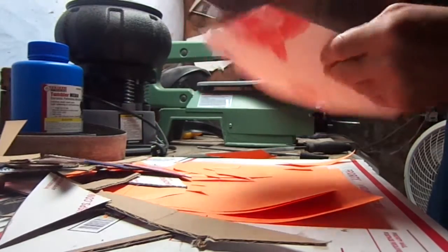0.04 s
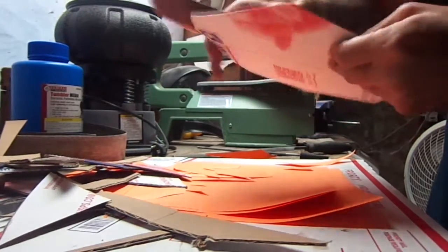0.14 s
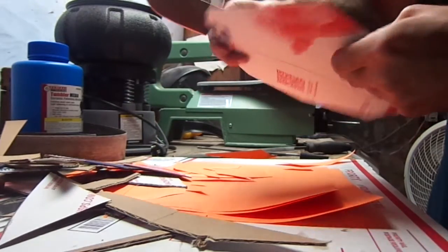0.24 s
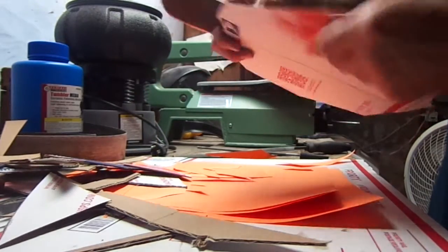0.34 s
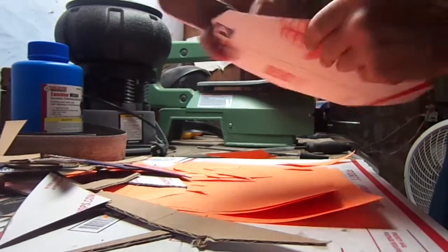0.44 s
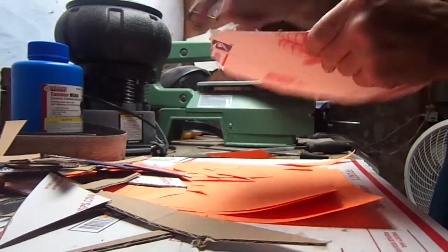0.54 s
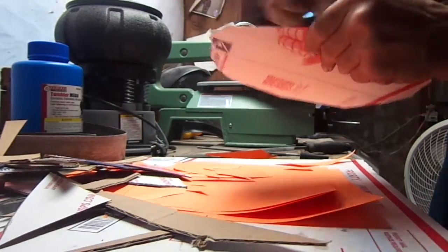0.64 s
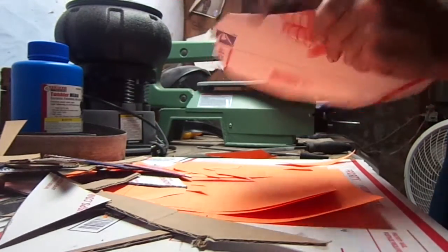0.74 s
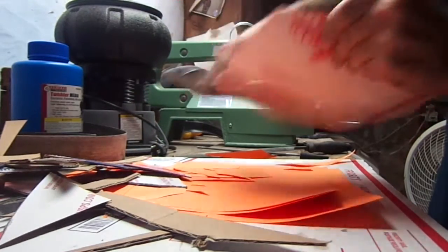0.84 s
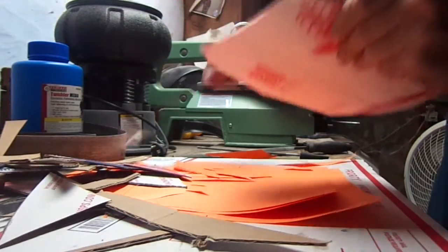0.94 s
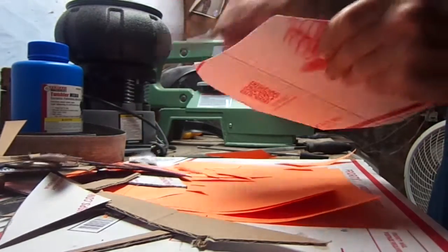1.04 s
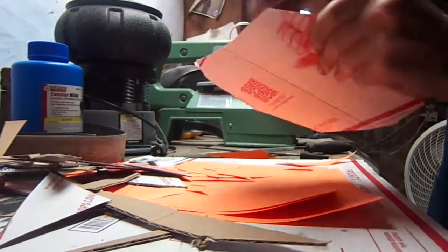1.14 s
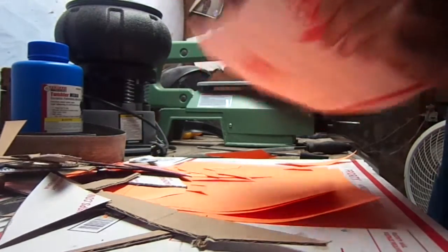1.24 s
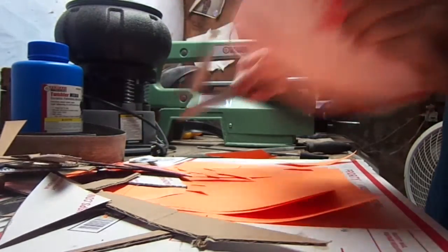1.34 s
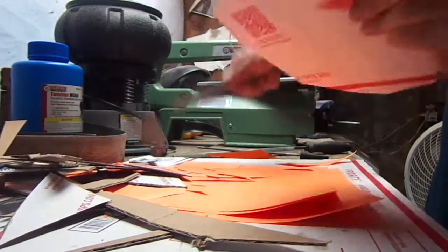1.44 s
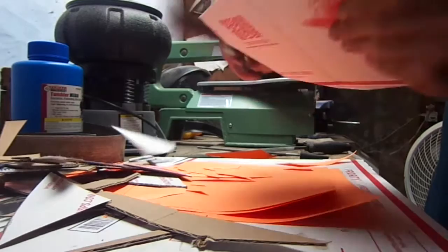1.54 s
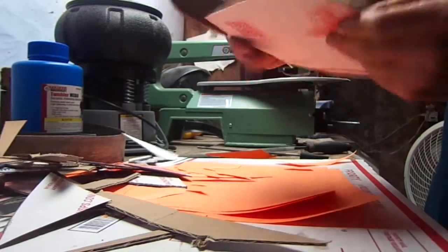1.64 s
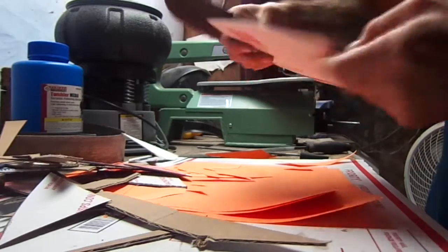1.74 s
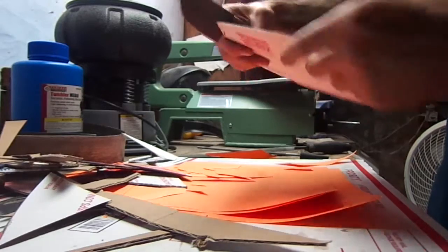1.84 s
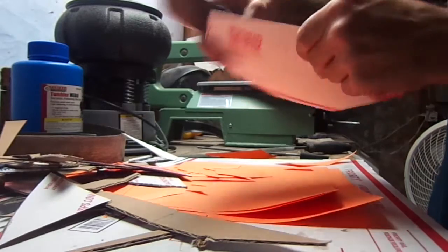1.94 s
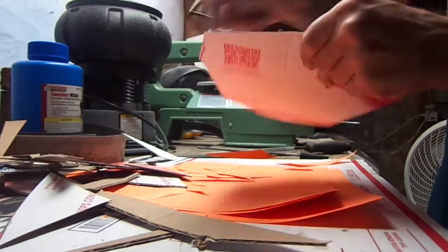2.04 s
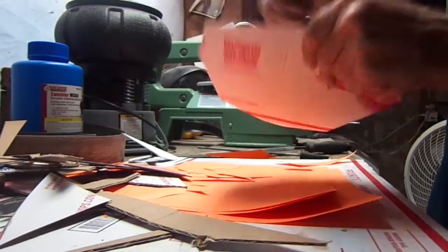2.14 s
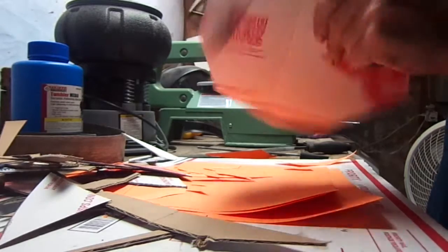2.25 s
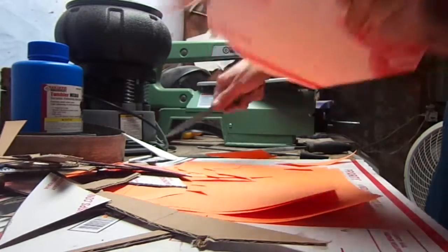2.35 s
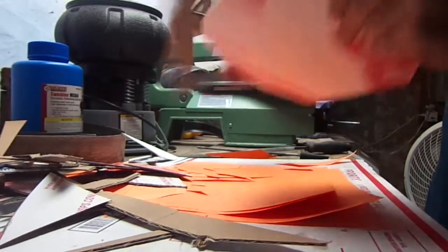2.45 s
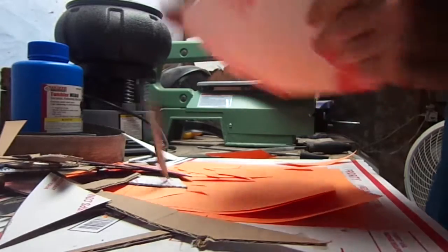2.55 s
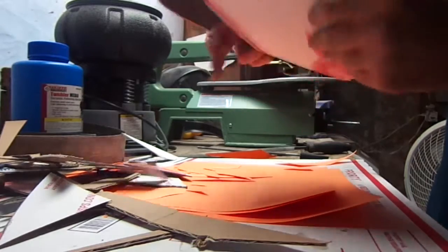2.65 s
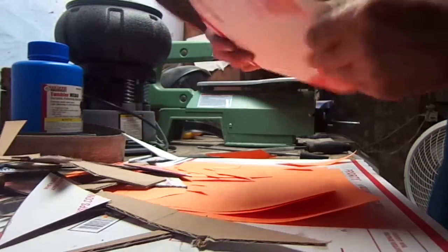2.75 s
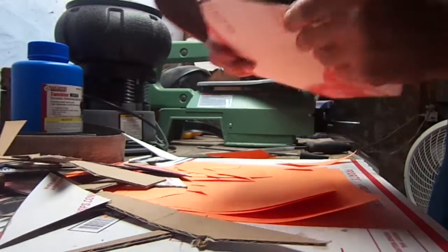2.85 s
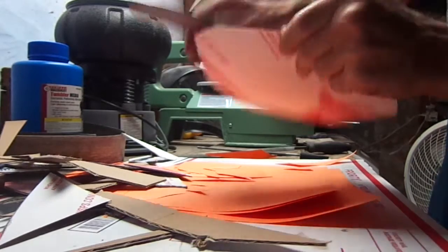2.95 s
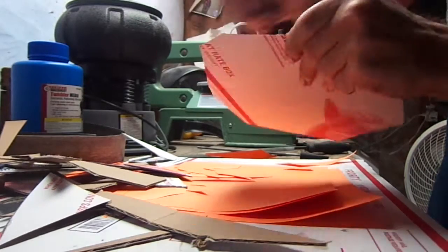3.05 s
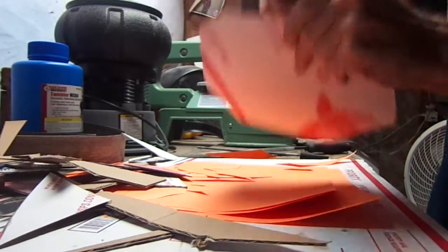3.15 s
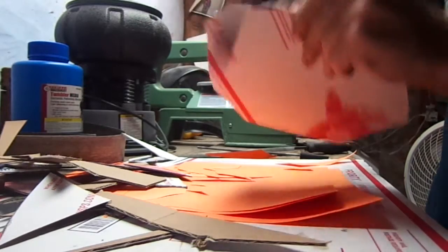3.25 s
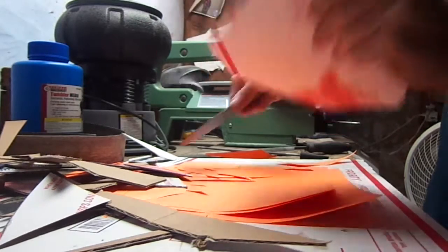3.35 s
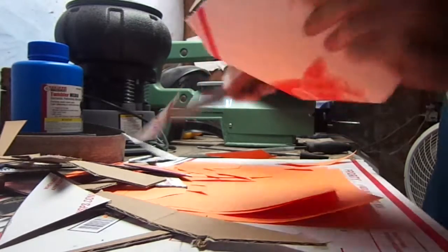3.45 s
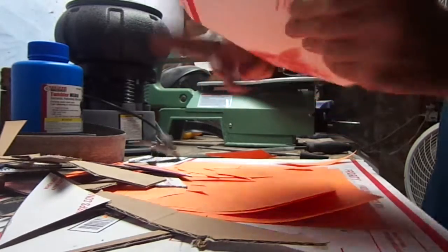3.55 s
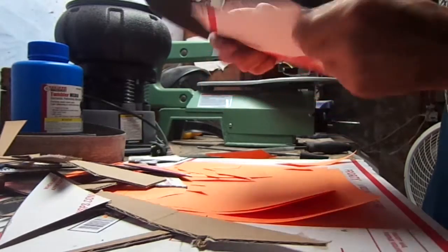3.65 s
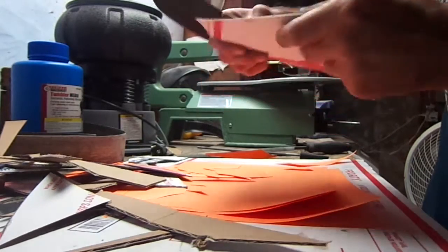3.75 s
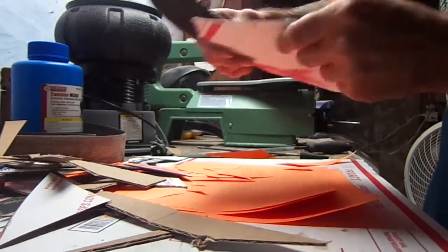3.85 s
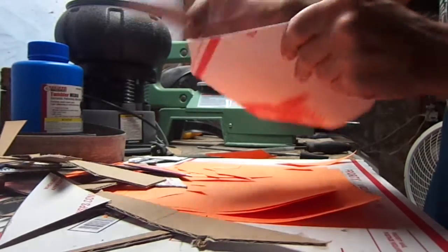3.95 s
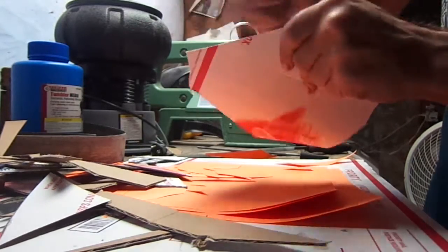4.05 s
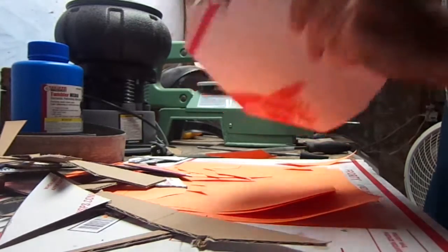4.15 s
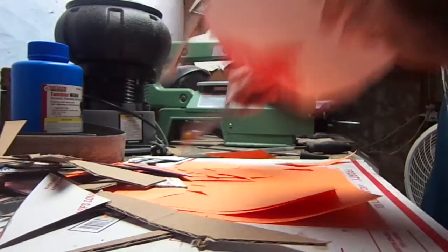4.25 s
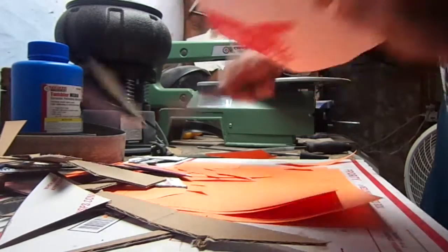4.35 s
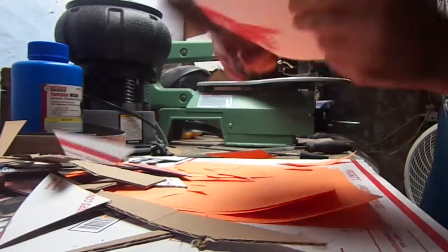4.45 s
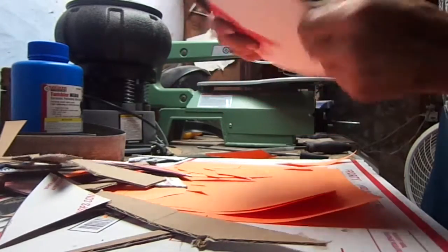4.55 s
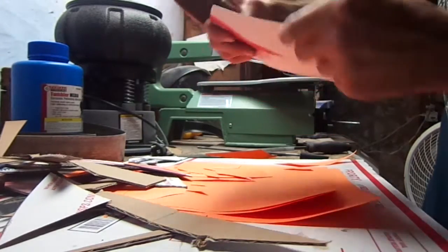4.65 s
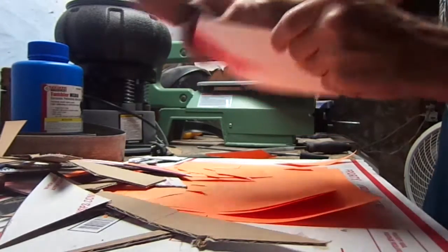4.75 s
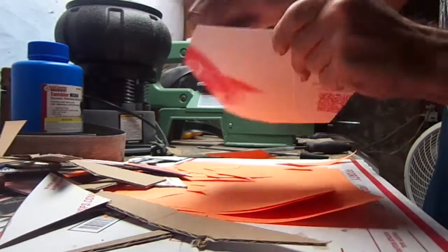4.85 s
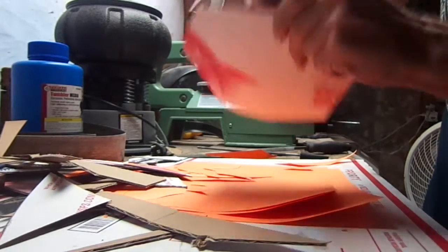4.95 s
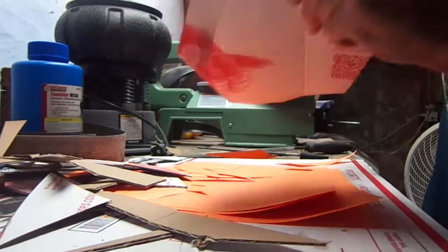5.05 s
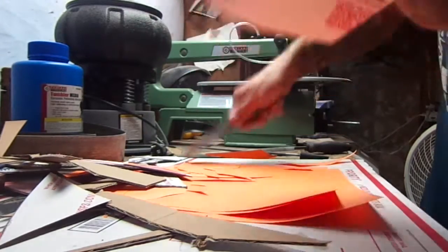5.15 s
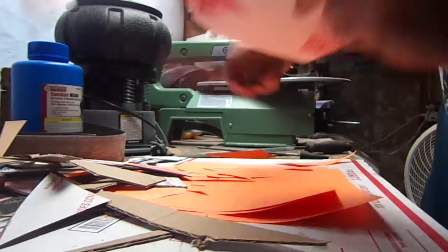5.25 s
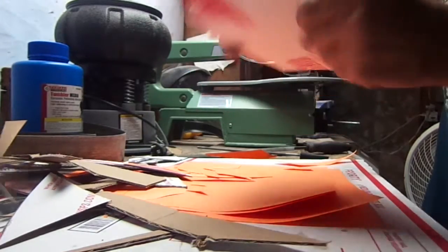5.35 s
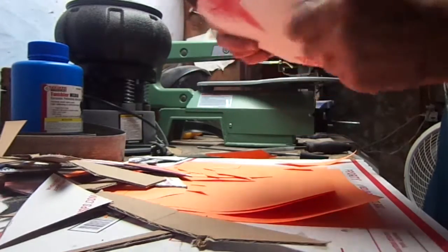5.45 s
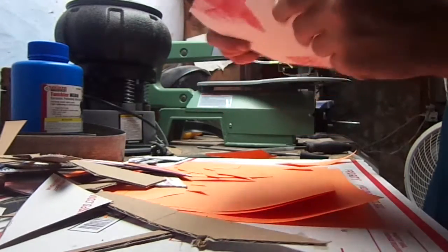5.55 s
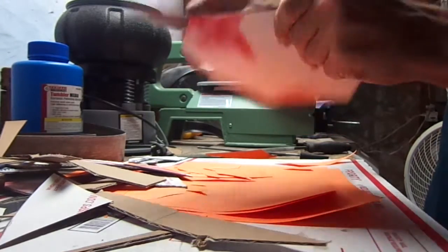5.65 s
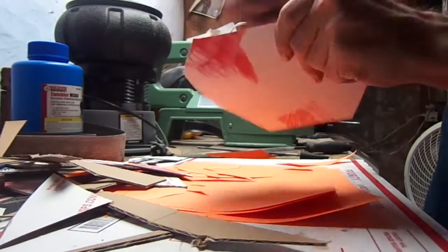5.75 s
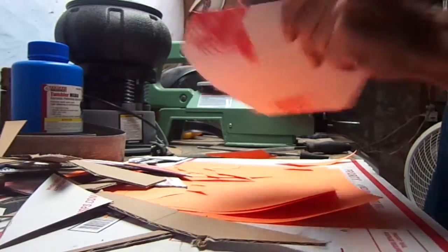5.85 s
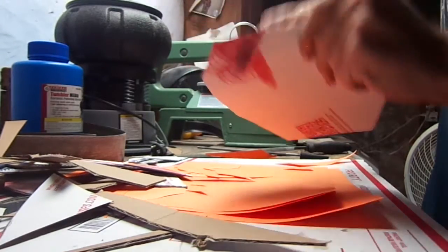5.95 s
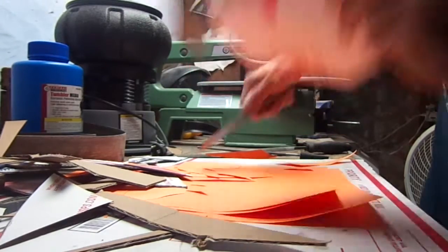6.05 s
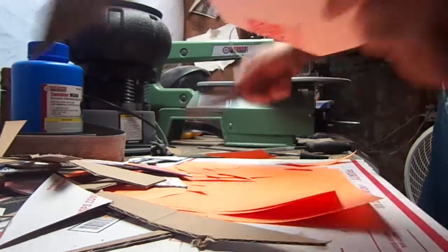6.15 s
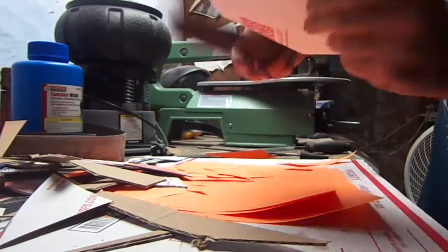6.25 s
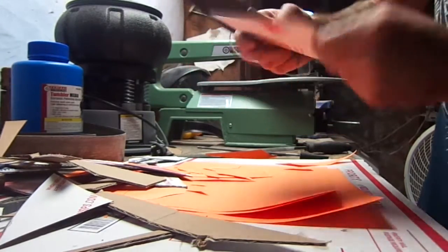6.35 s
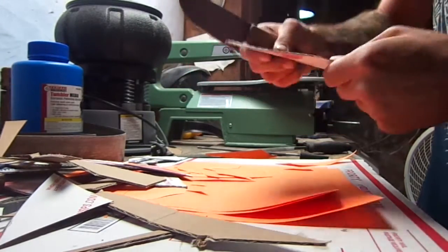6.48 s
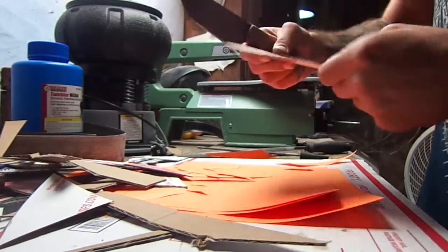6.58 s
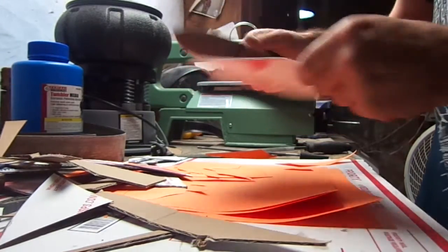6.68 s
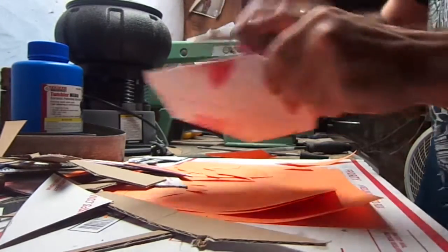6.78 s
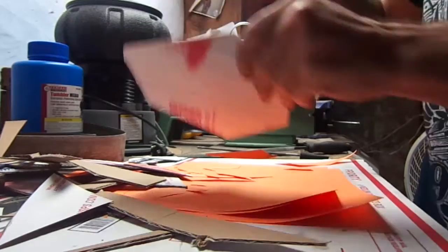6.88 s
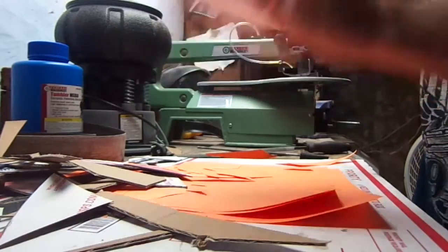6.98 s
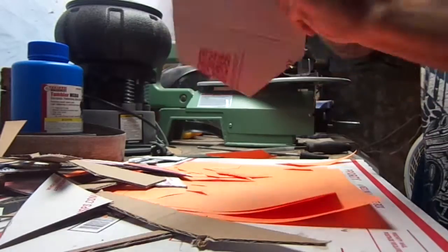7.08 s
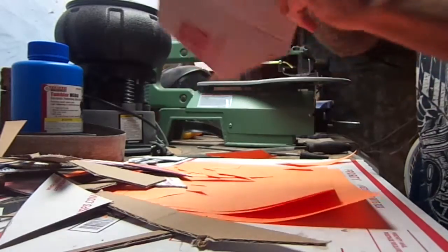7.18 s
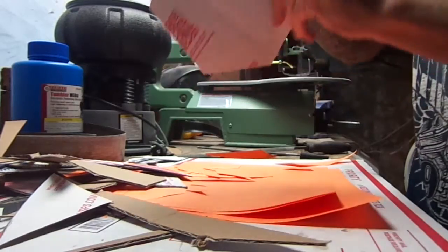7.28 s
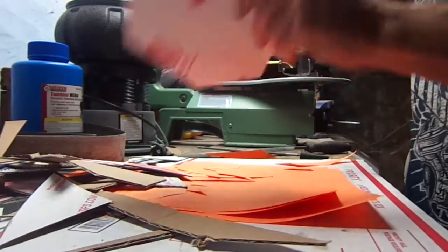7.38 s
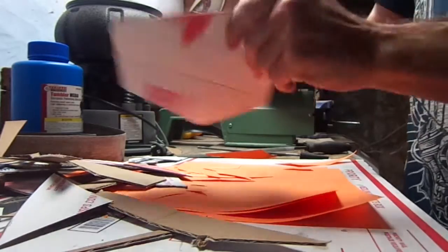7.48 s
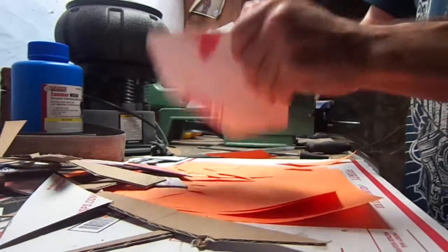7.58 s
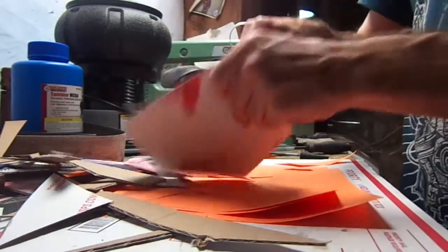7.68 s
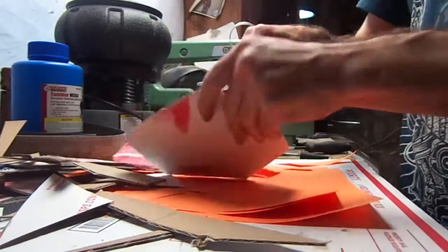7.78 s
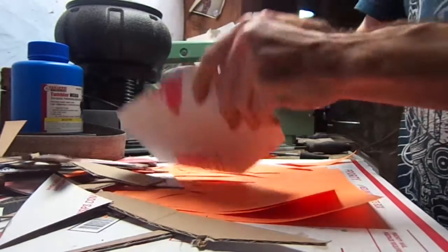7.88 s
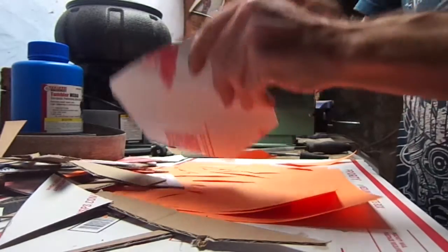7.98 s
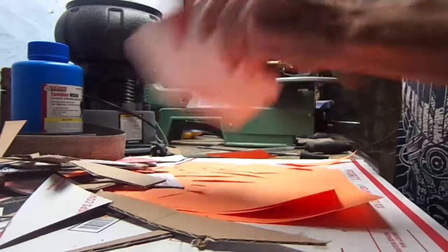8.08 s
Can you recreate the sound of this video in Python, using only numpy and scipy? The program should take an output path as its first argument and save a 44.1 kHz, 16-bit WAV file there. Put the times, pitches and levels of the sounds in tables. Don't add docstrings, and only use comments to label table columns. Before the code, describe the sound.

A knife slices strips off a hand-held sheet of card, seven crisp tearing cuts about a second apart, with offcuts dropping and rustling between.

```python
import sys
import numpy as np
from scipy import signal
from scipy.fft import rfft, irfft, next_fast_len
from scipy.io import wavfile
from scipy.ndimage import uniform_filter1d, map_coordinates

SR = 44100
rng = np.random.default_rng(int(sys.argv[2]) if len(sys.argv) > 2 else 0)


def inscribe(sig):
    pcm = np.round(np.clip(np.atleast_2d(sig).T, -1, 1) * 32767)
    wavfile.write(sys.argv[1], SR, pcm.astype(np.int16))


def attenuation_scalar(level_db):
    decades = np.asarray(level_db, float) / 20
    return 10 ** decades


N = 358091
LAG_S = .002

# bite in seconds, sinking in seconds, tearing in seconds, tearing level in dB,
# flap pitch in Hz.
CUTS = [
    (.722, 0.028, 0.078, -20, 1130),
    (1.236, 0.031, 0.055, -20, 425),
    (2.192, 0.031, 0.047, -20, 400),
    (3.179, 0.025, 0.1, -24, 920),
    (4.133, 0.015, 0.06, -21.5, 516),
    (4.987, 0.043, 0.034, -19, 1270),
    (5.846, 0.026, 0.14, -25, 1070),
]
# touch in seconds, peak in dB, pitch in Hz, crack in dB re peak,
# puff of fibres in dB.
EDGE_KNOCKS = [(0.72, -35, 1310, -10, -23.5), (.825, -32, 885, -8, -46), (1.236, -18, 940, 5, -17.5),
               (1.342, -23, 536, -20, -54), (2.1933, -15.5, 416, -32, -57), (2.1916, -17, 1140, -24, -40),
               (3.179, -24, 780, -11, -29), (3.18, -19.5, 456, -18, -50), (3.295, -18, 776, 5, -58),
               (3.309, -11.5, 895, -20, -35), (4.133, -16.5, 350, -5, -23), (4.219, -16.5, 1065, -17, -31),
               (4.239, -19.5, 372, -15, -50), (4.985, -21, 528, -18, -31), (5.071, -15, 2240, -11, -32),
               (5.8457, -12.5, 1106, -20, -24.5), (5.982, -24, 814, -8, -22),
               (6.0096, -11.5, 856, -25, -42)]
# touch in seconds, peak in dB, pitch in Hz, crack in
# dB re peak.
LANDINGS = [(0.061, -14.5, 607, 6), (.062, -11, 1100, -23), (.088, -35, 520, -22), (0.125, -19.5, 600, -28),
            (0.124, -34, 1060, -26), (0.197, -38.5, 440, -25), (.337, -39, 1130, -20),
            (0.949, -21, 1190, -13), (.949, -24.5, 750, -21), (.952, -23, 3000, -18),
            (0.953, -29, 3000, -15), (1.049, -31.5, 545, -14), (1.09, -41, 447, -16),
            (1.459, -30.5, 2050, -10), (1.471, -20, 1930, -33), (1.471, -26, 876, -17),
            (1.4875, -19, 2135, -9), (1.493, -26, 510, -14), (1.545, -39, 900, -20),
            (2.475, -42, 900, 10.5), (2.541, -24, 3050, -11), (2.541, -32.5, 422, -20),
            (2.635, -28, 415, -20), (2.634, -25.5, 4580, -5.5), (2.673, -25.5, 416, -10),
            (2.677, -25.5, 1330, -12), (2.546, -32, 1270, -18), (2.814, -42, 1480, 4),
            (2.852, -51, 1980, 15), (2.908, -39, 415, -12), (2.706, -32, 1700, -7), (2.707, -27, 3720, -6),
            ]


def unit(x):
    return x / np.sqrt(np.mean(x ** 2) + 1e-20)


def along(points, hz):
    f, v = np.transpose(points)
    return np.interp(np.log(hz + 1), np.log(f + 1), v)


def wobble(rate):
    knots = rng.standard_normal(int(N * rate / SR) + 4)
    return map_coordinates(knots, [np.arange(N) * rate / SR])


def filtered(x, response):
    m = next_fast_len(N + SR // 2)
    return irfft(rfft(x, m) * response(np.fft.rfftfreq(m, 1 / SR)), m)[..., :N]


def resonances(modes):
    def response(f):
        total = 0
        for k, (centre, width, db) in enumerate(modes):
            damping = 1j * f * width
            total = total + (-1) ** k * attenuation_scalar(db) * damping / (centre ** 2 - f ** 2 + damping)
        return total
    return response


def eased(gain, ms):
    size = int(ms * SR / 1000)
    return uniform_filter1d(gain, size=size, origin=(size - 1) // 2)


def strokes(rows):
    out = np.zeros(N)
    for s, rise, hold, fall, db in rows:
        first = max(int((s - 3 * rise) * SR), 0)
        last = min(int((s + hold + 3 * fall) * SR), N)
        t = np.arange(first, last) / SR
        away = np.maximum((s - t) / rise, (t - s - hold) / fall)
        out[first:last] += attenuation_scalar(db - 20 * np.maximum(0, away))
    return out


def fibres(share, spread_db, clump_db, patchy_db):
    size = attenuation_scalar(spread_db * rng.exponential(size=N))
    fire = (rng.random(N) < share) * rng.standard_normal(N) * size
    z = signal.stft(fire * attenuation_scalar(clump_db * (wobble(70) + wobble(300))), nperseg=256)[2]
    patches = uniform_filter1d(rng.standard_normal(z.shape), size=2, axis=0)
    patches = uniform_filter1d(patches, size=7, axis=1)
    return unit(signal.istft(z * attenuation_scalar(patchy_db * unit(patches)), nperseg=256)[1][:N])


def drum(force, low_hz):
    # resonance in Hz, width in Hz, level in dB.
    panel = [(393, 130, 5.5), (600, 61, 7.5), (817, 138, 0.5), (1080, 85, 5), (1330, 566, -4.5),
             (1560, 100, -41)]
    ringing = filtered(force, resonances(panel))
    return unit(filtered(ringing, lambda f: f ** 2 / (f ** 2 + low_hz ** 2)))


def air():
    # frequency in Hz, density in dB per Hz.
    colour = [(15, -36), (25, -9.5), (120, -2), (169, -2), (221, -2), (253, 1.5), (804, -4), (919, 2.5),
              (997, -1.5), (2560, -6), (3260, -9.5), (10600, -14.5), (11800, -13), (15500, -15.5)]
    # pitch in Hz, level in dB.
    whines = [(2218, -79.5), (12290, -79)]
    t = np.arange(N) / SR
    hiss = unit(filtered(rng.standard_normal(N), lambda f: attenuation_scalar(along(colour, f))))
    out = attenuation_scalar(-56 + 0.083 * wobble(5.1)) * hiss
    for hz, db in whines:
        out += attenuation_scalar(db + 7 + 1.8 * wobble(8)) * np.sin(2 * np.pi * hz * t)
    return out


def knocks():
    # touch in
    # seconds, peak in dB, pitch in Hz, crack in dB re peak.
    flicks = [(.002, -32, 1420, -20), (0, -38, 2400, -20), (.8255, -15, 6500, -8), (1.919, -27, 5500, 5.5),
              (1.617, -38, 740, -15.5), (1.626, -30.5, 610, 4), (1.632, -29.5, 483, -18),
              (1.673, -32.5, 1000, 7.5), (1.906, -27, 1080, -1), (1.918, -29.5, 408, -10),
              (1.919, -25, 1660, -13), (1.945, -26, 1130, -9), (2.87, -35.5, 410, 5.5),
              (3.865, -42, 815, 10), (4.713, -29.5, 630, 5), (4.737, -29, 920, -6),
              (4.737, -30.5, 3540, -8), (5.527, -36, 1450, -17), (5.616, -38, 960, -1),
              (6.622, -46, 2560, 6), (7.573, -18, 319, -30), (7.574, -18, 1170, -23),
              (7.573, -17, 720, -26), (7.639, -37, 284, -25), (7.598, -29, 415, -21),
              (7.608, -33, 406, -25), (7.615, -33, 332, -21), (7.6858, -21.5, 1380, -30),
              (7.691, -27, 1500, -25.5), (7.728, -30, 2940, -15), (7.71, -30, 1500, -20),
              (7.714, -28.5, 4250, 8.5), (7.723, -14, 1224, -9), (7.768, -18.5, 848, 3),
              (7.864, -36, 600, 3), (7.872, -32.5, 1400, -9), (7.724, -22.5, 2250, -13),
              (8.116, -44, 1570, 8), (3.826, -41, 900, -8)]
    # touch in seconds, peak in dB, pitch in Hz,
    # crack in dB re peak.
    pile_landings = [(3.449, -23.5, 917, -25), (3.453, -25, 2860, -19), (3.536, -33, 1200, -12),
                     (3.566, -23, 1060, -24), (3.612, -26, 1080, -10), (3.623, -19, 449, -1.5),
                     (3.624, -20.5, 1015, -28), (3.693, -36.5, 480, -25), (4.407, -21.5, 1240, -3.5),
                     (4.408, -26.5, 620, -22), (4.486, -28.5, 400, -20), (4.521, -31, 3600, 0),
                     (4.54, -32, 2490, 10.5), (4.545, -34, 410, -25), (5.32, -33.5, 940, 8.5),
                     (5.359, -35, 1190, -10), (5.367, -26.5, 623, -19), (5.364, -26, 1080, -21),
                     (5.39, -27, 1080, -7), (5.384, -24, 1560, 5.5), (6.268, -23.5, 3600, -3),
                     (6.268, -41, 470, -20), (6.305, -22.5, 573, -3), (6.305, -23.5, 332, -25),
                     (6.311, -21, 1500, -10), (6.334, -31.5, 615, 7), (6.353, -19, 1080, -11)]
    rise_cycles = .15
    out, t = np.zeros(N + SR), np.arange(SR // 8) / SR
    for s, db, hz, crack_db in [row[:4] for row in EDGE_KNOCKS] + LANDINGS + pile_landings + flicks:
        ratio = np.array([1.023, 0.557, 1.525, 2.3]) * np.exp(rng.normal(0, 0.14, 4) * [0, 1, 1, 1])
        stiffness = 1 + min(2.2 * (hz / 3000) ** 4, 1.6)
        speed = (hz * ratio / 700) ** 1.03 / np.array([stiffness, 1, 1, 1])
        ring = 0
        for gain, r, v in zip([0.65, 0.079, 0.33, 0.22], ratio, speed):
            ring = ring + gain * attenuation_scalar(-60 * t / 0.049 * v) * np.sin(2 * np.pi * hz * r * t)
        snap = 0.088 * (1 - t / 0.00016) * np.exp(-t / 0.000089)
        noise = rng.standard_normal((2, len(t)))
        rattle = signal.lfilter([.3], [1, -.7], noise[0]) * 0.36 * attenuation_scalar(-60 * t / 0.062)
        grit = signal.lfilter([1, -1], [1, -.57], noise[1])
        crack = grit * attenuation_scalar(crack_db - 1.5) * (attenuation_scalar(-60 * t / 0.0086) + 0.15 * attenuation_scalar(-60 * t / 0.02))
        first_swing = 1 + 2.04 * np.exp(-t * hz)
        body = ring * first_swing * (1 - np.exp(-t * hz / rise_cycles)) + snap + rattle + crack
        foot = signal.butter(2, 0.45 * hz, 'high', fs=SR)
        start = round((s + LAG_S - rise_cycles / hz) * SR)
        out[start:][:len(t)] += attenuation_scalar(db - 0.6) * signal.lfilter(*foot, body)
    return out[:N]


def rubs():
    # start in seconds, 20 dB fall in
    # seconds, rub in dB, drum in dB re rub.
    skids = [(0, .05, -50, 7), (.066, .021, -26, 7), (.08, .075, -39, 6), (.954, .045, -35, 6),
             (1.052, .15, -61, 8), (1.475, .095, -42, 10), (1.924, .06, -36, 5), (1.463, .03, -44, 4),
             (3.536, .03, -42, 3), (2.478, .03, -48, -5), (2.546, .03, -33, 3), (2.638, .012, -37, -2),
             (3.452, .042, -38, 6), (3.628, .09, -35, 4), (4.412, .045, -35.5, 10), (4.6, .055, -36, -11),
             (6.271, .023, -31, -17), (6.341, .13, -35.5, 2), (6.62, .04, -48, -13),
             (7.058, .045, -33.5, 16)]
    # peak in seconds, 20 dB rise in seconds,
    # 20 dB fall in seconds, rub in dB, drum in dB re rub.
    pulls = [(.244, .055, .03, -42, -10), (.348, .05, .05, -41, -11), (.462, .06, .03, -46, -5),
             (1.87, .1, .1, -50, -5), (2.596, .1, .03, -40.5, -10), (2.772, .2, .022, -42, -9),
             (2.91, .13, .025, -41, 1), (3.578, .135, .12, -43, 3), (3.88, .063, .033, -39, -10),
             (4.7, .083, .05, -41, -8), (5.392, .11, .032, -32, -3), (5.622, .067, .018, -40, -7.5),
             (6.508, .3, .15, -47.5, -14), (7.496, .15, .21, -40, -3), (7.72, .045, .025, -31, -4),
             (7.856, .15, .05, -42.5, -7), (8.11, .04, .021, -51, 0)]
    # start in seconds, length in seconds, rub in dB, drum in
    # dB re rub.
    slides = [(.135, .08, -57, 14), (.225, .245, -49, -8), (.308, .066, -43, -13), (1.56, .06, -55, 5),
              (1.628, .135, -43, -6), (1.911, .01, -40, -3), (1.96, .014, -39, -6), (2.648, .07, -47, 4),
              (3.688, .11, -48.5, -5), (3.974, .08, -51, 13), (4.444, .04, -50, 4), (4.487, .052, -34, -6),
              (4.56, .04, -44, -2), (4.71, .036, -39, -1), (5.416, .18, -48.5, -3), (5.64, .08, -60, 6),
              (6.17, .095, -52, -14), (6.312, .03, -39, 5), (7.002, .038, -29, 7), (7.36, .06, -52, -10),
              (7.589, .09, -52, 14), (7.765, .06, -43, 1)]
    # frequency in Hz, density in dB per Hz.
    grain = [(880, -14), (1500, -4), (1990, -12), (2280, 2), (2940, 4), (3180, 5), (5780, -0.5),
             (12000, 1.5), (14500, -8.5), (15500, -46)]
    moves = [(s, 0.0067, 0, fall, db, re) for s, fall, db, re in skids]
    moves += [(s, rise, 0, fall, db, re) for s, rise, fall, db, re in pulls]
    moves += [(s, 0.011, hold, 0.021, db, re) for s, hold, db, re in slides]
    rub_gain = strokes([row[:5] for row in moves])
    linger = 0.82
    drum_gain = strokes([(s, rise, hold, fall * linger, db + re) for s, rise, hold, fall, db, re in moves])
    force = fibres(share=.6, spread_db=1.1, clump_db=.9, patchy_db=2.2)
    rub = unit(filtered(force, lambda f: attenuation_scalar(along(grain, f))))
    drumming = eased(attenuation_scalar(-4.5) * drum_gain, ms=7.6) * drum(force, low_hz=600)
    return eased(attenuation_scalar(-4.5) * rub_gain, ms=1.2) * rub + drumming


def shop(x):
    # frequency in Hz, 60 dB decay in seconds.
    decay = [(150, 1), (600, 0.55), (1200, 0.35), (2000, 0.35), (5000, 0.26), (12000, 0.18)]
    step, out = SR // 5, np.zeros(N + 2 * SR)
    x = np.pad(x, (step, 2 * step))
    hz, t, z = signal.stft(rng.standard_normal((N // step + 2, SR // 2)), SR, nperseg=256)
    tails = signal.istft(z * attenuation_scalar(-60 * t / along(decay, hz)[:, None]), SR, nperseg=256)[1]
    for k, tail in enumerate(tails):
        part = x[k * step:][:2 * step] * np.hanning(2 * step)
        answer = signal.fftconvolve(part, tail / np.linalg.norm(tail))
        out[k * step + 300:][:len(answer)] += answer
    return out[step:][:N]


def bench():
    # start in seconds, peak in dB.
    thumps = [(0.059, -40.5), (0.72, -34), (0.826, -32), (1.048, -42.5), (1.24, -31), (1.31, -32.5),
              (1.489, -42), (1.63, -41.5), (1.919, -41), (2.191, -52), (2.257, -35.5), (2.648, -38),
              (2.718, -44), (3.18, -35.5), (3.301, -32.5), (4.131, -38), (4.409, -42.5), (4.486, -44),
              (4.599, -59), (4.709, -46), (5.076, -36), (5.317, -41), (5.859, -38), (6.018, -36),
              (6.304, -29.5), (6.993, -34), (7.592, -26.5), (7.757, -35)]
    # pitch in Hz, level in dB, 60 dB decay in seconds.
    modes = [(67, -5, 0.095), (99, -4.5, 0.15), (156.1, 3, 0.31), (227.3, 7.5, 0.14), (290, 3.5, 0.22)]
    out, t = np.zeros(N + SR), np.arange(SR // 2) / SR
    for s, db in thumps:
        ring = 0
        for hz, level, t60 in modes:
            gain = attenuation_scalar(level + rng.normal(0, 2.5) - 60 * t / t60)
            ring = ring + gain * np.sin(2 * np.pi * hz * rng.normal(1, .03) * t)
        out[round(s * SR):][:len(t)] += attenuation_scalar(db - 9.5) * ring * (1 - np.exp(-t / 0.0047))
    return out[:N]


def flutters():
    # middle in seconds, length in seconds, first pitch
    # in Hz, last pitch in Hz, peak in dB.
    glides = [(0.097, .06, 400, 411, -37), (0.75, 0.013, 1370, 1335, -24), (0.757, 0.024, 1115, 1060, -22.5),
              (0.761, 0.029, 558, 467, -23.5), (0.767, .02, 844, 816, -23.5),
              (0.782, 0.024, 1560, 1570, -25.5), (0.803, 0.012, 980, 990, -22),
              (0.816, 0.031, 1402, 1500, -26), (.845, 0.028, 450, 510, -31), (1.281, 0.014, 708, 600, -18),
              (1.295, 0.03, 437, 400, -17), (1.296, 0.021, 1730, 1760, -24.5),
              (1.308, 0.0091, 1670, 1670, -21), (1.322, 0.032, 428, 400, -27), (1.651, .06, 265, 283, -40.5),
              (1.953, 0.013, 1450, 1610, -32.5), (2.224, .018, 1530, 1340, -22.5),
              (2.245, .022, 790, 801, -24), (2.247, 0.02, 1110, 1080, -24), (2.251, 0.037, 376, 377, -24),
              (2.274, 0.017, 443, 510, -35), (3.209, .03, 568, 552, -31), (3.24, .06, 290, 236, -29),
              (3.279, 0.017, 1128, 1087, -22), (3.281, 0.018, 760, 790, -25),
              (3.892, 0.019, 1550, 1550, -44), (3.991, 0.038, 1490, 1450, -44),
            (3.992, 0.039, 997, 1054, -45), (4.006, 0.016, 1380, 1380, -40),
            (4.031, 0.017, 1640, 1605, -39), (4.026, 0.036, 1070, 1010, -48),
            (4.052, 0.023, 1460, 1450, -49), (4.165, 0.022, 1120, 1250, -27),
            (4.173, 0.054, 395, 509, -24.5), (4.206, 0.016, 600, 530, -20.5),
            (4.222, 0.018, 400, 390, -22.5), (4.528, 0.017, 3260, 3200, -32.5),
            (5.031, 0.013, 1297, 1280, -24), (5.058, 0.019, 1295, 1290, -24),
            (5.07, 0.015, 538, 600, -23.5), (5.917, 0.018, 946, 1060, -26),
            (5.948, 0.017, 1630, 1620, -25.5), (5.962, 0.031, 1098, 1037, -26),
            (5.987, 0.033, 800, 830, -27.5), (7.022, 0.027, 1080, 1030, -29),
            (7.15, 0.036, 1217, 1212, -28.5), (7.281, 0.00813, 1140, 1170, -33),
            (7.291, .03, 1160, 1200, -30), (7.306, 0.029, 417, 400, -36)]
    out = np.zeros(N)
    for s, length, from_hz, to_hz, db in glides:
        u = np.arange(int(2.2 * length * SR)) / (1.56 * length * SR)
        turns = np.cumsum(from_hz + (to_hz - from_hz) * u) / SR + rng.random()
        note = np.sin(np.pi * u) ** 2 * np.sin(2 * np.pi * turns)
        out[int((s - .75 * length) * SR):][:len(u)] += attenuation_scalar(db) * note
    return out * attenuation_scalar(1.2 * wobble(150))


def blade(release_s):
    lull_s, lull_db, arch_db = 0.007, -21, -1
    t, out = np.arange(N) / SR, []
    for s, sink, tear, db, _ in CUTS:
        end = s + sink + tear
        times = [s, s + lull_s, s + sink, end - tear / 2, end, end + 3 * release_s]
        levels = [lull_db, lull_db, arch_db, 0, arch_db, arch_db - 60]
        out.append(attenuation_scalar(db + np.interp(t, times, levels, left=-150, right=-150)))
    return np.array(out)


def cuts():
    # frequency in Hz, density in dB per Hz.
    colour = [(880, -8.5), (1500, -3), (1720, -18), (1950, -14), (2310, -5), (3120, -2.5), (3480, -3),
              (5190, -4.5), (5950, -7.5), (11600, -3.5), (14300, -11.5), (15100, -15.5), (15500, -41.5)]
    tear_db, pitch_hz = np.transpose(CUTS)[3:]
    puffs = strokes([(row[0] + LAG_S, .001, 0, .0073, row[4]) for row in EDGE_KNOCKS])
    flap_db = -2.5 - np.log2(pitch_hz / 400) - 0.11 * (tear_db + 20)
    drum_gain = attenuation_scalar(flap_db) @ blade(release_s=.054) + attenuation_scalar(9.5) * puffs
    tear_gain = blade(release_s=.012).sum(axis=0) + puffs
    force = fibres(share=.4, spread_db=1.8, clump_db=1.2, patchy_db=3)
    tear = unit(filtered(force, lambda f: attenuation_scalar(along(colour, f))))
    drumming = eased(attenuation_scalar(-2.5) * drum_gain, ms=8.0) * drum(force, low_hz=235)
    return eased(attenuation_scalar(1.0) * tear_gain, ms=3.6) * tear + drumming


def tray():
    # touch in seconds, peak in dB, floor modes in dB, crack in dB.
    hits = [
        (6.983, 6.5, -8, -23.5),
        (6.9915, -7.5, -27, -25),
        (7.0414, -17, -11, -24),
        (7.0463, -4, 7.5, -17),
        (7.0505, -10.5, -20, -21),
    ]
    # pitch in Hz, level in dB, 60 dB decay in seconds.
    walls = [(530, -5, 0.037), (790, -3, 0.045), (950, 2.5, 0.036), (1080, 5.5, 0.036), (1428, 4, 0.039),
             (1550, 6.5, 0.057), (2240, -4, 0.04), (2770, 6.5, 0.013), (3230, -5.5, 0.027),
             (3650, 1, 0.018), (4371, -20, 0.039)]
    # pitch in Hz, level in dB,
    # 60 dB decay in seconds.
    floor = [(400, -2.5, 0.14), (414, 2, 0.17)]
    # start in seconds, 20 dB rise in seconds, hold in seconds,
    # 20 dB fall in seconds, level in dB.
    drags = [
        (7.115, .035, .05, .021, -31),
        (7.14, .05, 0, .05, -31),
        (7.281, .004, .012, .03, -44),
        (7.298, .03, 0, .033, -33),
    ]
    out, t = np.zeros(N + SR), np.arange(SR // 2) / SR

    def ring(modes):
        return sum(attenuation_scalar(db - 60 * t / t60) * np.sin(2 * np.pi * hz * t) for hz, db, t60 in modes)

    for s, db, floor_db, crack_db in hits:
        crack = attenuation_scalar(crack_db + 19.5 - 60 * t / 0.02) * rng.standard_normal(len(t))
        blow = ring(walls) + attenuation_scalar(floor_db) * ring(floor) + crack
        out[round((s + LAG_S) * SR):][:len(t)] += attenuation_scalar(db - 17.0) * blow
    grit = fibres(share=.7, spread_db=.9, clump_db=.5, patchy_db=.8)
    body = resonances([(415, 106, 4.0), (1190, 150, 6), (2000, 340, -3.5), (2670, 250, 0), (3220, 170, -1.5),
                       (3720, 150, 1), (4400, 500, -3.5), (5020, 180, -3), (5730, 210, -5),
                       (9700, 5200, -14.0)])
    return out[:N] + attenuation_scalar(2.0) * strokes(drags) * unit(filtered(grit, body))


def scene():
    near = cuts() + rubs() + knocks() + tray()
    song = flutters()
    far = filtered(shop(near + 0.65 * song), lambda f: f ** 2 / (f ** 2 + 520 ** 2))
    thin = filtered(near + song + attenuation_scalar(-11.5) * far, lambda f: (1j * f / (150 + 1j * f)) ** 3)
    mono = thin + bench() + air()
    return np.array([mono, mono])


def side_trace(x):
    # frequency in Hz, level in dB re sum.
    apart = [(60, -31.5), (180, -37.5), (550, -41), (1650, -37), (4970, -33.5), (15000, -30.5)]
    z = signal.stft(x, nperseg=512)[2]
    scramble = np.exp(2j * np.pi * rng.random(z.shape))
    present = np.repeat(rng.random(z.shape[1]) < .42, repeats=8)[:z.shape[1]]
    side = signal.istft(z * scramble * present, nperseg=512)[1][:N]
    return filtered(side, lambda f: attenuation_scalar(along(apart, f) + 16))


def low_pass(x):
    return signal.sosfilt(signal.butter(12, 16090, fs=SR, output="sos"), x)


def record(dry):
    # start in seconds, end in seconds.
    dropout = (8.112, 8.1165)
    top_hz = 15120
    t = np.arange(N) / SR
    x = dry[0] / (1 + np.abs(dry[0] / .98) ** 6) ** (1 / 6)
    x = filtered(x, lambda f: np.where(f < top_hz, 1, attenuation_scalar(-32)) * (f < 1.1 * top_hz))
    gap = sum((t > s - .013) & (t < s - .003) for s, *_ in LANDINGS[:1] + CUTS)
    x = x - uniform_filter1d(gap * 1., size=40) * filtered(x, lambda f: f > 3200)
    x = x - .0006
    side = side_trace(x)
    heard = (np.arange(N) < dropout[0] * SR) | (np.arange(N) > dropout[1] * SR)
    mix = np.array([x + side, x - side]) * uniform_filter1d(1. * heard, size=24)
    return low_pass(mix)


dry = scene()
out = record(dry)
inscribe(out)
```